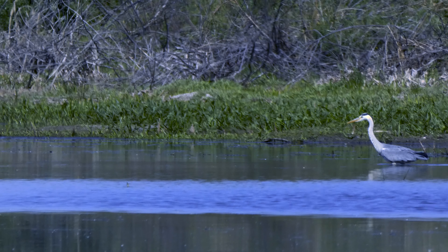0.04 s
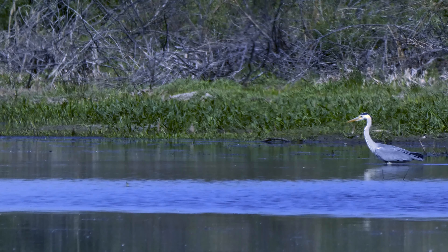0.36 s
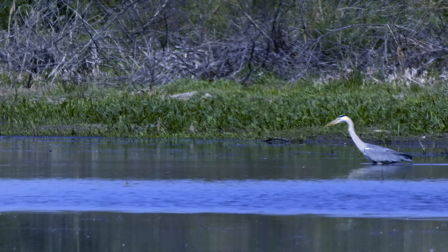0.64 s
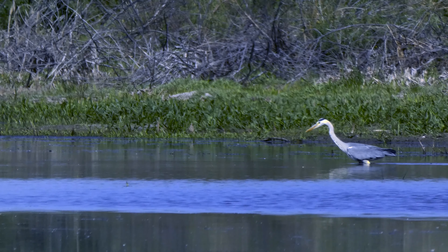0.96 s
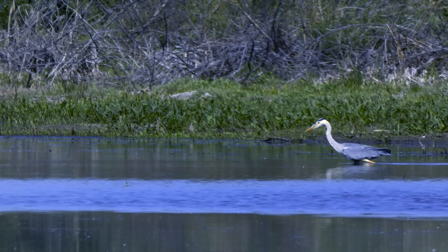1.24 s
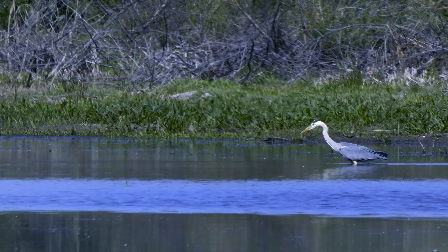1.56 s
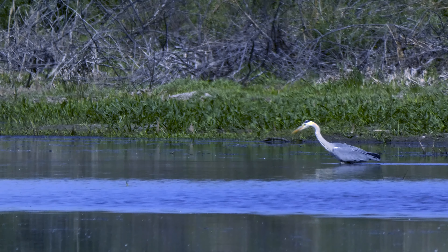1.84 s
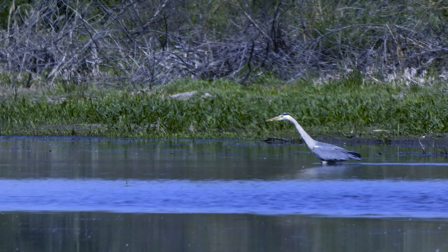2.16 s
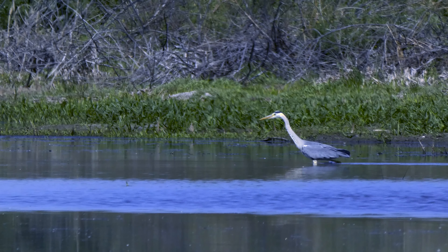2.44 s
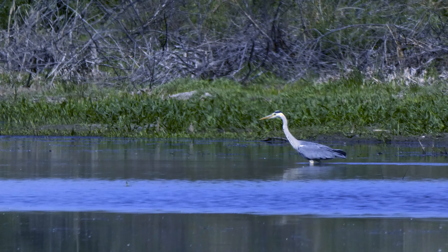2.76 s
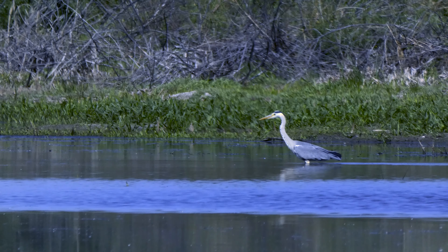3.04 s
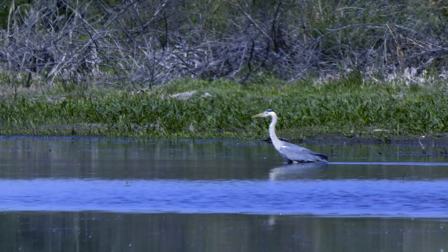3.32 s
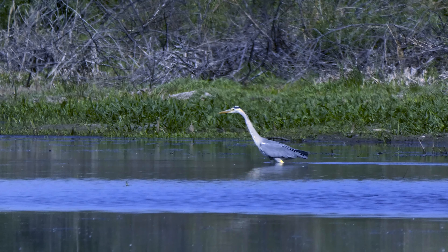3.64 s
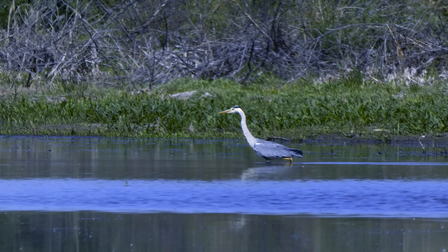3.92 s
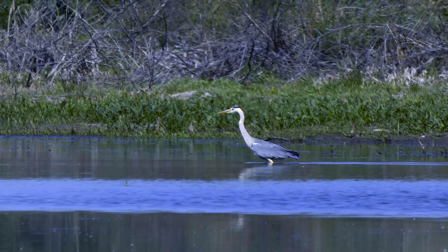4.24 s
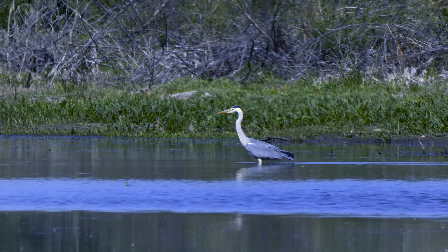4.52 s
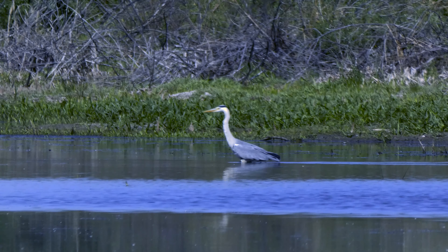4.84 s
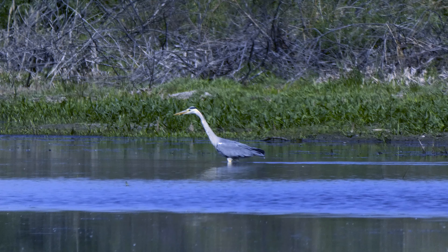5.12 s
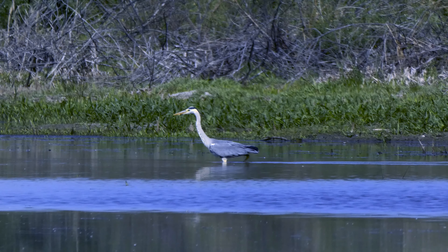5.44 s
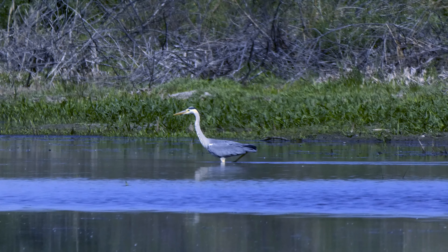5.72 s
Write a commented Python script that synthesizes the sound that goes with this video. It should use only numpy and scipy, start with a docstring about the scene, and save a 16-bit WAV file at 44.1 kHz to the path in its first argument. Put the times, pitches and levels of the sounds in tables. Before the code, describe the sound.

At the edge of a pond, a small songbird close on the left alternates buzzy slurs with thin, high whistles. A light gust rustles past at the start, with a few soft bumps on the microphone. Other birds then chip and twitter further off, with faint low hoots beyond. Near the end the close bird sings again, its notes echoing lightly over a quiet, steady hush.

```python
"""At the edge of a pond, small songbirds sing. One, close on the left, alternates a thin whistle with
a buzzy slur, a syrinx tone that throbs rapidly; others chip, slur and twitter further off, with low
hoots beyond. Reeds and the far bank scatter the song over a quiet outdoor hush, and early on a gust
rustles past with a few soft bumps at the microphone."""
import sys
import numpy as np
from scipy import signal
from scipy.fft import rfft, irfft
from scipy.io import wavfile
from scipy.ndimage import uniform_filter1d

SR = 44100
rng = np.random.default_rng(int(sys.argv[2]) if len(sys.argv) > 2 else 0)


def transcribe(signal):
    """Save signal, clipped to [-1, 1], as a 16-bit WAV file at the path in sys.argv[1]."""
    frames = np.atleast_2d(signal).T
    limited = np.clip(frames, -1, 1)
    pcm = np.round(limited * 32767).astype(np.int16)
    wavfile.write(sys.argv[1], SR, pcm)


N = 254898
T = np.arange(N) / SR
FREQ = np.maximum(np.arange(N // 2 + 1) * SR / N, 1)


def undb(db):
    """Decibels to gain."""
    return 10 ** (np.asarray(db) / 20)


def unit(x):
    """Scale to rms 1."""
    return x / np.sqrt(np.mean(x ** 2))


def wander(rate_hz):
    """Smooth random wandering with rms 1."""
    return unit(irfft(rfft(rng.standard_normal(N)) / (1 + (FREQ / rate_hz) ** 4), N))


def colour(points):
    """Gain per frequency from (frequency [Hz], level [dB]) points."""
    hz, db = np.transpose(points)
    return undb(np.interp(np.log(FREQ), np.log(hz), db))


def noise(gain, side):
    """Stereo noise with a given spectrum and side share; the middle has rms 1."""
    mid, wide = rfft(rng.standard_normal((2, N))) * gain
    mid, wide = irfft(mid, N), irfft(wide * side, N)
    return np.array([mid + wide, mid - wide]) / np.std(mid)


def place(x, pan_db):
    """A source on the left reaches the right microphone weaker."""
    return np.array([x, x * undb(-pan_db)])


def scatter(x, t60_s, build_s, late_s=0):
    """Echoes off many stems and twigs, different at each microphone."""
    t = np.maximum(T[:SR] - late_s, 0)
    twigs = rng.standard_normal((2, SR)) ** 3
    response = twigs * np.exp(-np.log(1000) * t / t60_s) * (1 - np.exp(-(t / build_s) ** 2))
    response /= np.sqrt(np.sum(response ** 2, axis=1, keepdims=True))
    return signal.fftconvolve(x[None], response, axes=1)[:, :N]


def syrinx(contour, octave_db=-40, throb_hz=0, swing_hz=0, pulsing=0, unsteady=.002, edge_s=0.00065):
    """A bird's tone along (time [s], pitch [Hz], level [dB]); an uneven throb swings pitch and level."""
    s, hz, db = np.transpose(contour)
    s = np.sort(s)
    on = (T >= s[0]) & (T <= s[-1])
    t = T[on]
    jitter = uniform_filter1d(rng.standard_normal((2, SR // 2)), size=130)
    drift, waver = (unit(row)[:len(t)] for row in jitter)
    throb = 2 * np.pi * np.cumsum(throb_hz * (1 + .13 * drift)) / SR
    pitch = np.interp(t, s, hz) * (1 + unsteady * waver) + swing_hz * np.sin(throb)
    phase = 2 * np.pi * np.cumsum(pitch) / SR
    edges = np.clip(np.minimum(t - s[0], s[-1] - t) / edge_s, 0, 1)
    pulse = 1 + pulsing * np.sin(throb + .5)  # loudest near the top of each swing
    envelope = undb(np.interp(t, s, db)) * edges * pulse
    out = np.zeros(N)
    out[on] = np.sqrt(2) * envelope * (np.sin(phase) + undb(octave_db) * np.sin(2 * phase))
    return out


def hush(air_db=-67):
    """The steady, wide air of the place, with a faint, wavering drone far off."""
    # spectrum of the air: (frequency [Hz], relative density [dB])
    spectrum = [(30, -23.5), (87, 2), (250, -4.5), (330, -7.5), (404, -1), (450, -11), (570, -5),
                (860, -11.5), (1830, -20), (3500, -20), (5900, -19), (8200, -24), (10000, -21),
                (15000, -31.5)]
    # its stereo width: (frequency [Hz], side minus mid [dB])
    stereo_width = [(60, -7), (200, 6), (700, 5.5), (1400, 5.5), (3000, -1), (6000, -7), (15000, -1.5)]
    # bands of the drone: (centre [Hz], width [Hz], level [dB])
    bands = [(101.5, 43, -80.5), (418, 33, -77), (567, 120, -78.5)]
    side = colour(stereo_width)
    air = noise(colour(spectrum), side) * undb(air_db + .7 * wander(1.03))
    drone = sum(undb(db + 1.2 * wander(2.6)) * noise(1 / (1 + (2 * (FREQ - hz) / width) ** 2), side)
                for hz, width, db in bands)
    return air + drone


def flock(count=170):
    """Many short glides from so far off that only their echoes reach the microphones."""
    # rise and fall of the chatter: (time [s], relative level [dB])
    chatter = [(0, -50), (1.9, -74), (2.2, -64.5), (2.9, -71), (3.4, -69.5), (4.3, -108), (5.7, -88.5)]
    chance = rng.random((count, 3))
    starts = (np.arange(count) + chance[:, 0]) / count * (T[-1] - .1)
    glides_hz = 2950 + 1550 * chance[:, 1:]
    song = sum(syrinx([(s, first, 0), (s + 0.0264, last, -3)], edge_s=0.014)
               for s, (first, last) in zip(starts, glides_hz))
    echoes = unit(scatter(song, t60_s=0.62, build_s=0.016))
    return echoes * undb(np.interp(T, *np.transpose(chatter)) - 7.5)


def hoots(hz=504, width_hz=88, attack_s=0.068, release_s=0.08):
    """Brief low calls, smeared by distance into a narrow, rough band."""
    # far hoots: (peak time [s], level [dB])
    calls = [(2.37, -67.5), (2.53, -75), (2.64, -65.5)]
    band = noise(1 / (1 + (2 * (FREQ - hz) / width_hz) ** 4), side=0.52)
    swells = sum(undb(db) * np.exp(-np.maximum((s - T) / attack_s, (T - s) / release_s))
                 for s, db in calls)
    return band * swells


def gust(dying_db_per_s=9):
    """Wind rustles past, brighter when strong; its low and high parts flutter separately."""
    # strength of the gust: (time [s], relative level [dB])
    strength = [(.24, -62.5), (.54, -60.5), (.61, -54), (.77, -54), (.87, -57), (1, -54.5), (1.19, -58),
                (1.48, -58), (1.9, -71)]
    # spectrum of its rustle: (frequency [Hz], relative density [dB])
    rustle = [(30, -28), (55, -22), (110, -0.5), (220, -5.5), (380, 0), (700, -3.5), (1300, -4.5),
              (2100, -6.5), (3200, -8.5), (5000, -15), (6800, -17.5), (8200, -23), (10000, -22.5),
              (15000, -42)]
    s, strength_db = np.transpose(strength)
    db = np.interp(T, s, strength_db) - dying_db_per_s * np.maximum(T - s[-1], 0)
    bright_db = 2.5 + 0.4 * (db - db.max())
    air = noise(colour(rustle), side=undb(-3.5))
    low = irfft(rfft(air) / (1 + (FREQ / 1400) ** 4), N)
    hiss = (air - low) * undb(bright_db + wander(27)) * undb([[1.5], [-1.5]])  # leans to the left
    body = low * undb(0.7 * wander(41)) * undb([[.8], [-.8]])
    return (body + hiss) * undb(db)


def bumps():
    """Dull, quickly damped knocks at the microphone, with a little scuff in them."""
    # soft bumps: (time [s], pitch [Hz], time scale [s], relative level [dB])
    knocks = [(0.624, 327, .005, -66), (0.754, 357, 0.0049, -39), (0.932, 342, 0.0017, -42),
              (.969, 1320, 0.0025, -45), (0.98, 1020, 0.0011, -39), (1.009, 713, 0.002, -38),
              (1.047, 1480, 0.0017, -42.5)]
    out = np.zeros(N)
    for s, hz, scale_s, db in knocks:
        age = np.maximum(T - s, 0)
        scuff = noise(1 / (1 + (FREQ / hz - hz / FREQ) ** 2), side=0)[0]
        swell = age / scale_s * np.exp(1 - age / (0.68 * scale_s))
        out += undb(db) * swell * (np.sin(2 * np.pi * hz * age) + 0.76 * scuff)
    return place(out, pan_db=2.5)


def hook(s, hz, db, length_s=.048, drop_share=.11):
    """A note that starts level and curls down ever faster."""
    u = np.linspace(0, 1, 12)
    pitch = hz * (1 - drop_share * u ** 3)
    arch_db = db + 0.5 - 5 * (2 * u - 1) ** 2
    return syrinx(np.transpose([s + length_s * u, pitch, arch_db]), unsteady=0.0088)


def hook_run(first_s, last_s, db, spacing_s=.069, first_hz=5890, step_hz=85):
    """Evenly spaced hooked notes, each a little higher than the one before."""
    starts = np.linspace(first_s, last_s, round((last_s - first_s) / spacing_s) + 1)
    return sum(hook(s, first_hz + step_hz * k, db) for k, s in enumerate(starts))


def rattle(first_s=3.123, last_s=3.715, count=9):
    """A far bird's dry rattle, loudest in the middle: downward sweeps so quick that they click."""
    times = np.linspace(first_s, last_s, count)
    levels_db = -67.5 - np.linspace(-1, 1, count) ** 2
    return sum(syrinx([(s - .003, 7600, db - 14), (s, 6660, db - 5.6), (s + .002, 5900, db),
                       (s + .008, 5000, db - 4)], unsteady=0.025) for s, db in zip(times, levels_db))


def buzz(s, length, hz, climb_hz, db, fade_db, swell_s, scoop_s=0.02):
    """Contour of a buzz: it scoops up, swells, glides as it fades, eases once and droops at the end."""
    u = np.linspace(0, 1, 120)
    age = u * length
    scoop = np.maximum(1 - age / scoop_s, 0)
    ease = np.exp(-((u - 0.419) / 0.0655) ** 2)  # between two pushes
    droop = np.exp((u - 1) / 0.0803)
    pitch_hz = hz + climb_hz * u - 951 * scoop - 92.4 * ease - 227 * droop
    push_db = db - np.interp(age, [0, swell_s, length], [9, 0, fade_db])
    level_db = push_db - 13 * np.sqrt(scoop) - 3.5 * ease - 6 * droop
    return np.transpose([s + age, pitch_hz, level_db])


def far_birds():
    """Answering buzzes, twitters and a rattle, far off to the left and blurred by the thicket."""
    # answering buzzes: (start [s], length [s], pitch [Hz], climb [Hz], level [dB], fade [dB], swell [s])
    replies = [(4.483, .27, 3448, -66, -62.5, 7, 0.05), (5.238, 0.25, 3254, 120.5, -56, 12.5, 0.045)]
    # runs of hooked notes: (first note [s], last note [s], relative level [dB])
    runs = [(2.643, 2.787, -74), (3.141, 3.272, -74), (3.6, 3.805, -75.5), (4.093, 4.225, -73)]
    answers = sum(syrinx(buzz(*row), throb_hz=202.4, swing_hz=139, pulsing=0.43, unsteady=0.013)
                  for row in replies)
    twitter = sum(hook_run(*row) for row in runs) + rattle()
    thicket = undb(-6.5) * scatter(answers, t60_s=0.42, build_s=0.01)
    thicket += undb(-3.5) * scatter(twitter, t60_s=0.25, build_s=0.0033)
    return place(answers, pan_db=4) + place(undb(0.5) * twitter, pan_db=3) + thicket


def slur(s, length, first_hz, last_hz, bow_hz, db, peak_share, edge_db=13.5):
    """Contour of one bowed glide that swells to a peak and fades."""
    u = np.linspace(0, 1, 40)
    pitch = first_hz + (last_hz - first_hz) * u + bow_hz * (1 - (2 * u - 1) ** 2)
    off_peak = np.interp(u, [0, peak_share, 1], [1, 0, 1])
    return np.transpose([s + length * u, pitch, db - edge_db * off_peak ** 1.28])


def birds_ahead():
    """Slurs, a chip and a wheeze from straight ahead of the microphones, with echoes off the thicket."""
    # clear slurs: (start [s], length [s], first pitch [Hz], last pitch [Hz], bow [Hz],
    # relative level [dB], loudest point [share of length])
    slurs = [ (0.38, 0.0054, 8400, 4430, 0, -50.5, 0.63), (0.409, 0.051, 3530, 2990, 2, -50, 0.74),
             (0.459, 0.065, 2950, 3500, 70, -52, 0.42), (0.935, 0.022, 3720, 2910, 166, -50, .5),
             (1.333, 0.079, 5700, 5270, 476, -60, .7), (1.423, 0.034, 4030, 4600, 650, -60, .45),
             (1.681, 0.16, 2560, 1900, 232.5, -62.5, 0.2), (2.426, 0.068, 6770, 4750, 420, -45.5, .58),
             (2.363, 0.03, 3820, 3570, 190, -57, 0.26), (2.54, .05, 2500, 3340, -10, -65.5, .85),
             (3.203, 0.08, 3860, 2890, -200, -76, 0.89), (3.285, 0.056, 4350, 4360, 16, -68, 0.46),
             (3.457, 0.073, 4320, 4290, 78, -72, .55), (3.631, 0.053, 3600, 3580, 22, -71, 0.23),
             (3.885, 0.033, 3320, 3260, 106, -65, 0.36), (4.16, 0.0058, 2980, 3800, -2, -61, 0.44),
             (5.28, 0.034, 2450, 2430, 3, -69, .5)]
    # a two-part chip, its octave stronger than its fundamental; columns as for the slurs
    chip = [(2.332, .033, 2885, 3560, -380, -52.5, 0.92), (2.364, 0.0149, 2355, 3340, 430, -51, 0.26)]
    # a slow, high wheeze; columns as for the slurs
    wheezes = [(2.101, .15, 5130, 5650, -200, -64.5, 0.48)]
    song = sum(syrinx(slur(*row), octave_db=-41, unsteady=0.0065) for row in slurs)
    song += undb(-10) * sum(syrinx(slur(*row), octave_db=11.5, edge_s=0.00052) for row in chip)
    wheeze = sum(syrinx(slur(*row), throb_hz=108.8, swing_hz=302, pulsing=0.36, unsteady=0.036)
                 for row in wheezes)
    thicket = undb(-11) * scatter(wheeze, t60_s=0.15, build_s=0.0039)
    thicket += undb(-10.5) * scatter(song, t60_s=0.41, build_s=0.0027)
    return place(undb(-0.1) * song + wheeze, pan_db=0.5) + thicket


def near_whistles():
    """The close bird's pure notes start abruptly and mostly sag; the far shore returns them late."""
    # thin whistles: (start [s], length [s], pitch [Hz], fall [Hz], level [dB], level change [dB],
    # left minus right [dB])
    whistles = [ (0.378, 0.072, 4820, 82, -35.5, 0, 7), (0.917, 0.0767, 4790, 93.5, -38.5, 1, 14.5),
                (1.467, 0.092, 4838, 59.5, -40.5, -3, 8.5), (2.595, 0.067, 4690, -46, -63, 1, 0.5),
                (2.65, 0.11, 4730, -4.5, -67.5, -11, 0), (4.995, 0.072, 4960, -51, -70.5, 8, 1),
                (5.256, 0.062, 4956, 86.5, -45, 7, 9.5), (5.309, 0.051, 4880, 42, -47, -2.5, 5)]
    song = np.zeros((2, N))
    for s, length, hz, fall_hz, db, change_db, pan_db in whistles:
        contour = [(s, hz, db), (s + length, hz - fall_hz, db + change_db)]
        song += place(syrinx(contour, unsteady=0.0052, edge_s=0.0076), pan_db)
    reeds = undb(-10.5) * scatter(song[0], t60_s=0.36, build_s=0.0052)
    shore = undb(-21) * scatter(song[0], t60_s=0.76, build_s=0.012, late_s=0.161)
    return song + reeds + shore


def near_buzzes():
    """The bird close on the left rises quickly into a rapidly throbbing note."""
    # buzzy slurs: (start [s], length [s], pitch [Hz], climb [Hz], level [dB], fade [dB], swell [s],
    # throb rate [Hz], pitch swing [Hz], pulsing [0-1], octave [dB], left minus right [dB])
    buzzes = [ (0.205, 0.12, 3800, -140, -51.5, 0.5, 0.033, 239, 170, 0.1, -41, 10),
              (.601, .25, 3555, 361.5, -36.5, 14, 0.032, 209, 150, 0.37, -38, 8),
              (1.15, .24, 3669, 289.5, -35.5, 10.5, 0.04, 220.5, 143, 0.3, -48, 11),
              (4.951, 0.22, 3443, 271, -46, 3, 0.021, 220, 210, 0.4, -23.5, 14.5),
              (5.478, 0.23, 3780, 110.5, -29.5, 12, 0.062, 192.5, 81.5, 0, -42, 16)]
    song = np.zeros((2, N))
    for *shape, throb_hz, swing_hz, pulsing, octave_db, pan_db in buzzes:
        tone = syrinx(buzz(*shape), octave_db, throb_hz, swing_hz, pulsing, unsteady=0.01, edge_s=0.0017)
        song += place(tone, pan_db)
    # reeds around the perch send one echo to both microphones, the bank answers from all round
    reeds = place(undb(-8.5) * scatter(song[0], t60_s=0.19, build_s=0.0032)[0], pan_db=0)
    bank = undb(-13.5) * scatter(song[0], t60_s=0.97, build_s=0.013)
    return song + reeds + bank


def scene():
    """The pond from its edge: birds near and far over wind and hush."""
    birds = near_buzzes() + near_whistles() + birds_ahead() + far_birds() + hoots() + flock()
    return birds + gust() + bumps() + hush()


def record(dry, start_s=.237, top_hz=15100):
    """The sound starts after a moment of silence; the top is cut steeply."""
    lowpass = signal.ellip(10, .2, 70, top_hz, fs=SR, output="sos")
    return signal.sosfilt(lowpass, dry * (T >= start_s))


dry = scene()
out = record(dry)
transcribe(out)
```